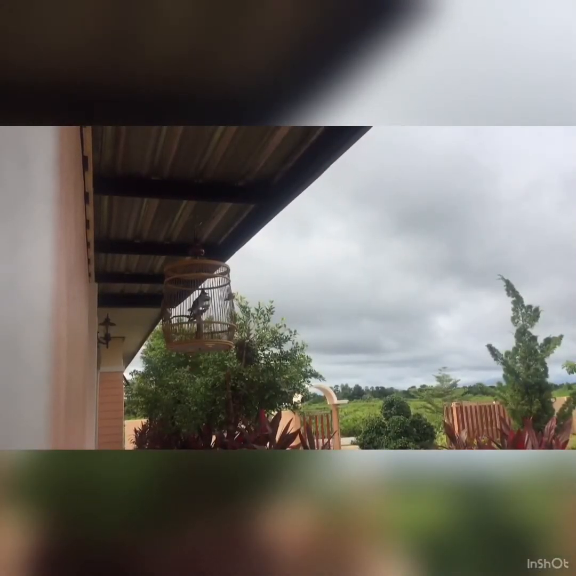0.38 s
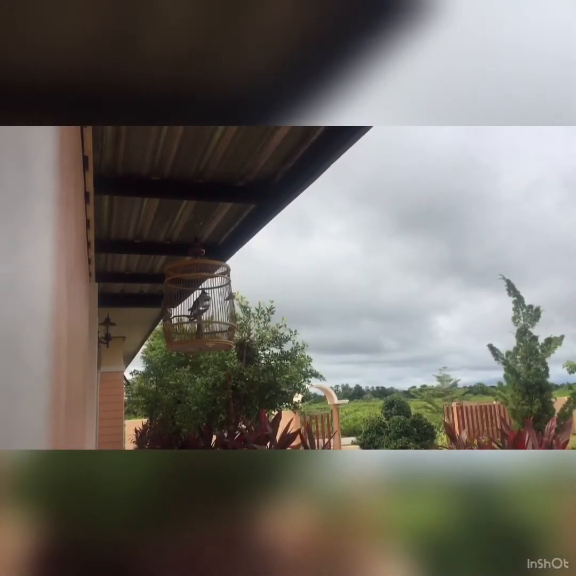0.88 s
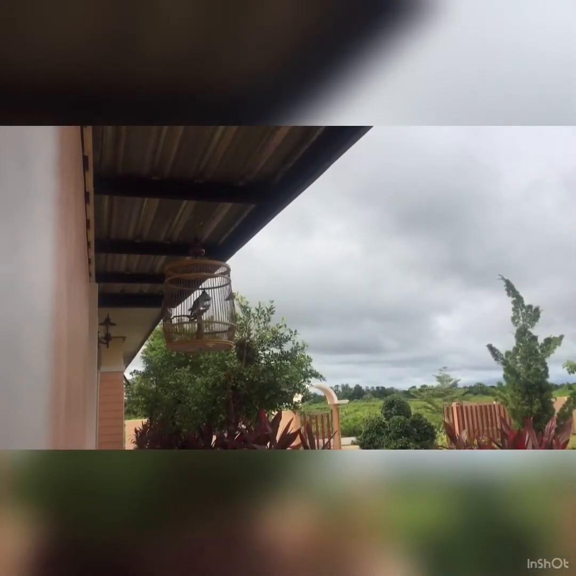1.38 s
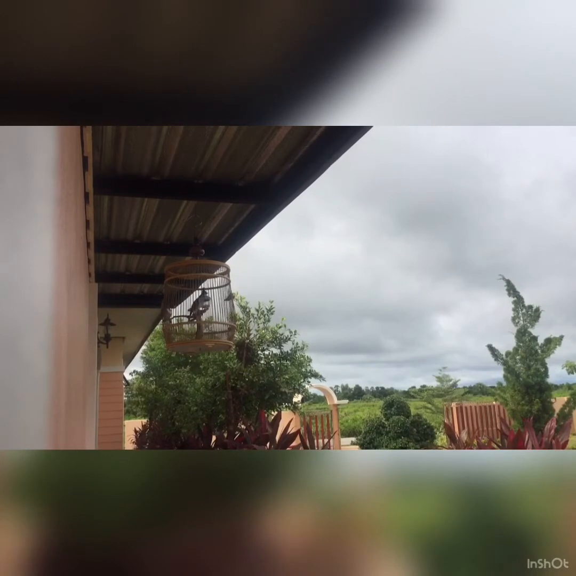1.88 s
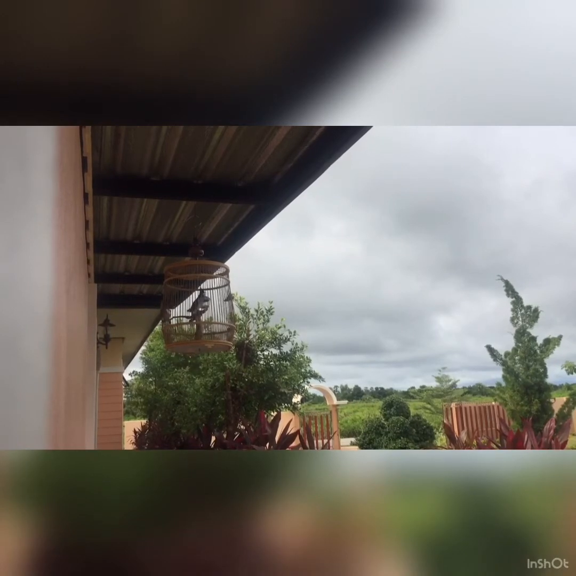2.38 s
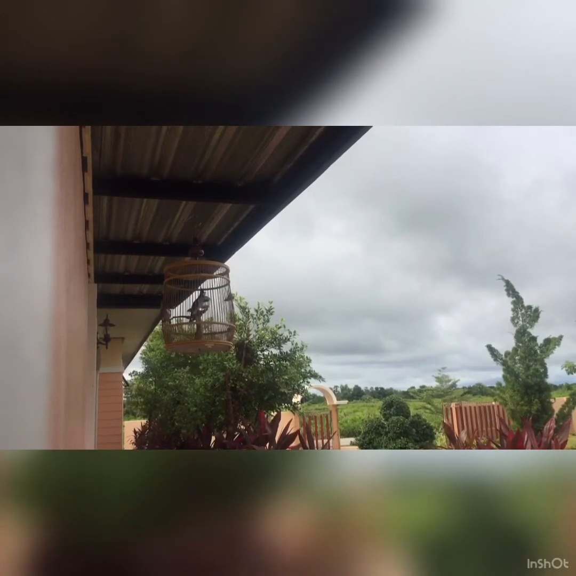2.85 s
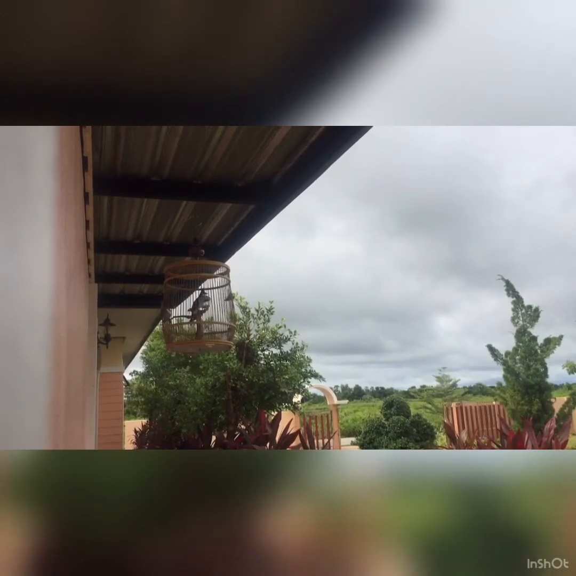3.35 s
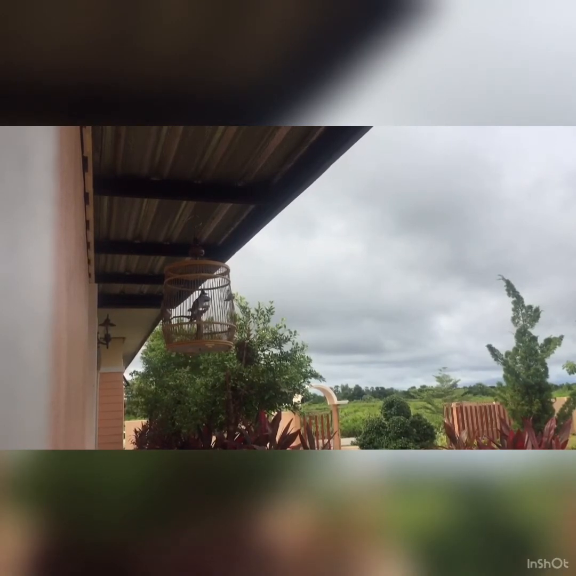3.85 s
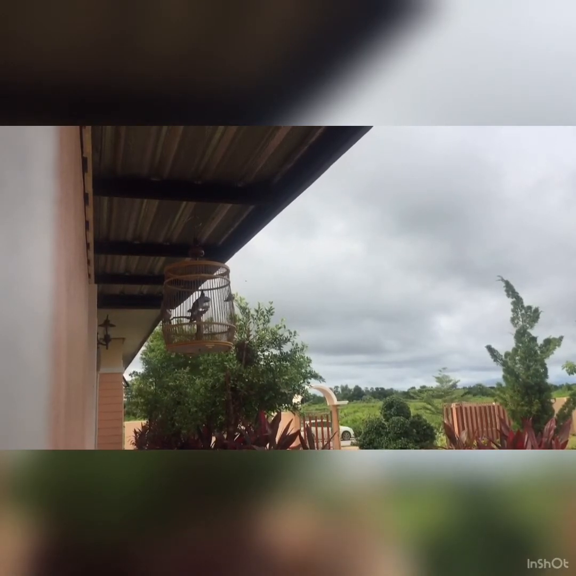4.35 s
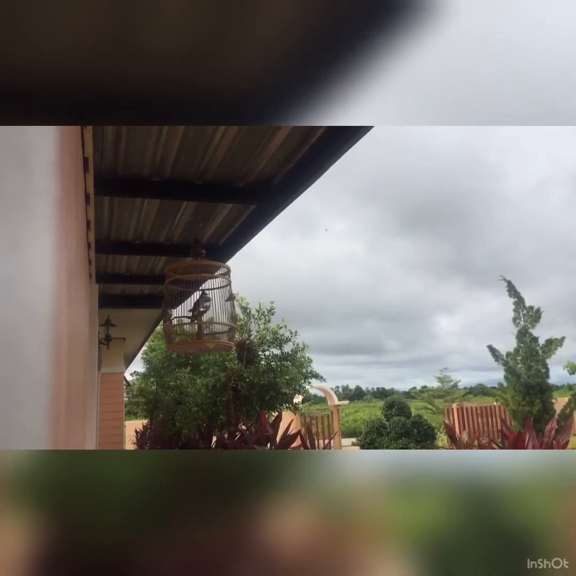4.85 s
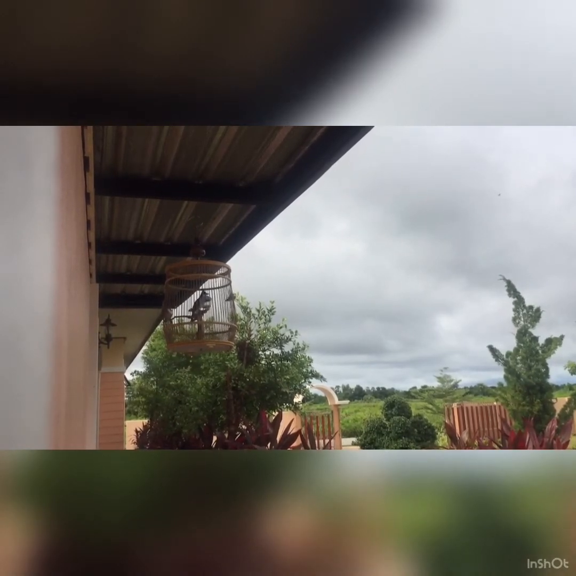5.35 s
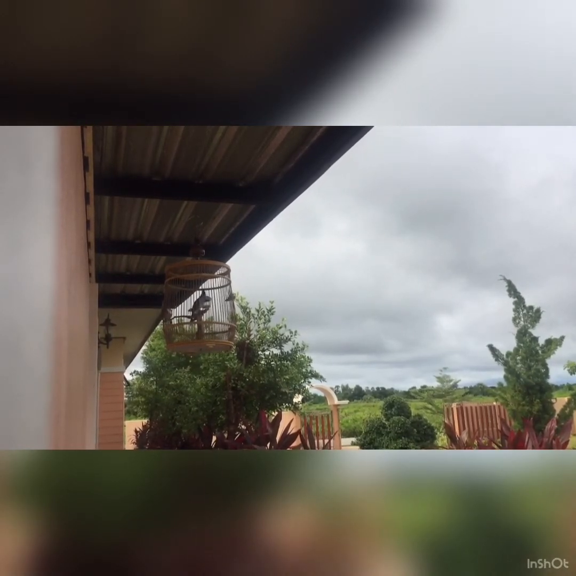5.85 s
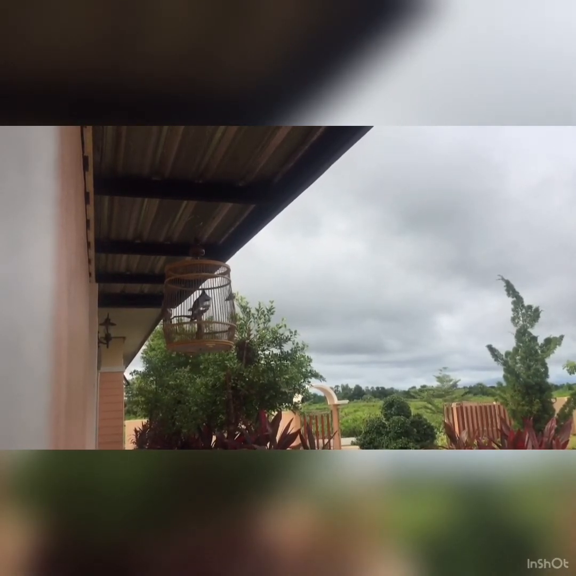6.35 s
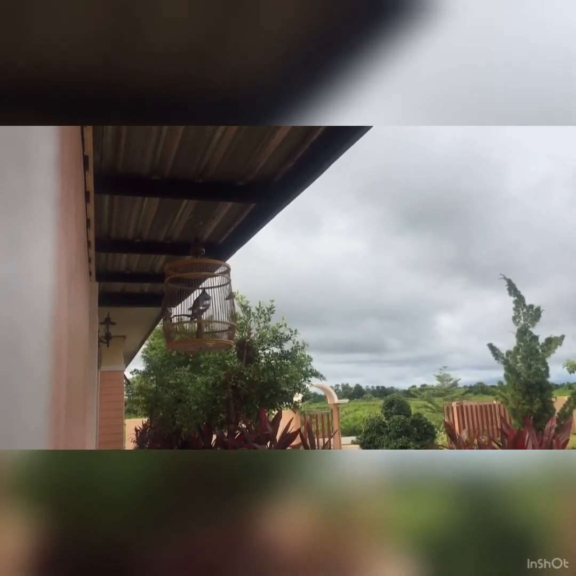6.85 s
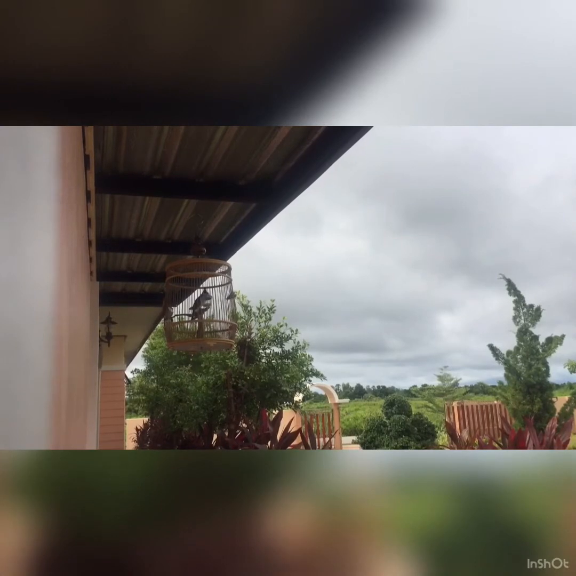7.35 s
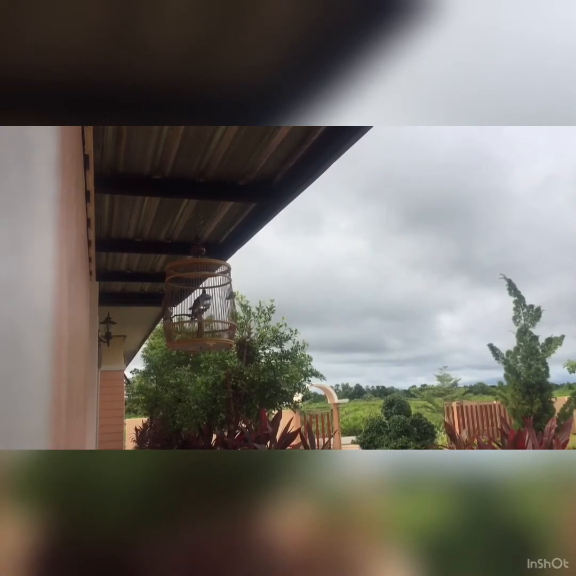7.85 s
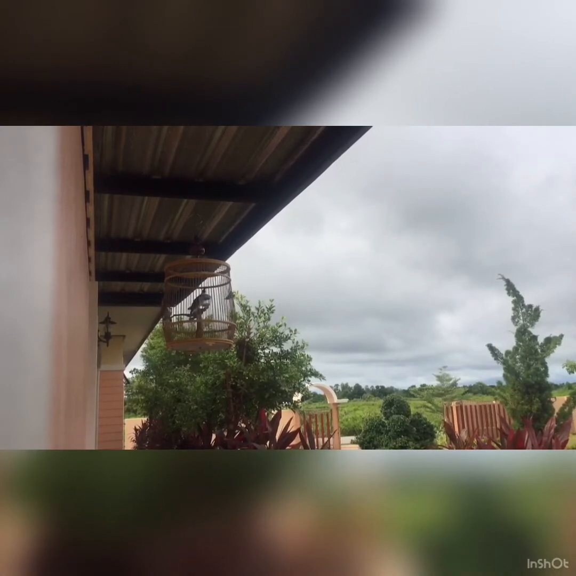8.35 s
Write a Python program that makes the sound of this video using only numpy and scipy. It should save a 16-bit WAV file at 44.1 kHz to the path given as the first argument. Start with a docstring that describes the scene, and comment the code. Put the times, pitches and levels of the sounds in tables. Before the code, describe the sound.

A small microphone under the eaves catches a quiet countryside: steady low hum, dull air and a faint insect whine, with a soft bright hiss fading at the start. A nearby songbird suddenly sings short, sharp, sliding whistles and a rattling roll, echoed by farther birds. A car's tyre roar rises quickly, passes and fades amid chirps. After a calm stretch, a short roll and two notes close it.

```python
"""A low engine hum, distant traffic and an insect's high buzz last all through; a bright hiss fades at first.
Near 2 s a caged songbird under the eaves of a country house sings whistled notes and a roll; others answer.
A car swells past beyond the garden near 5 s: shaped noise for its tyres, a wavering drone for its engine.
A neighbouring bird sings around it, and at the end, after a faint far call, sings a roll and two notes.
Birds are gliding near-sines with overtones and hiss, set among echoes; the insect is clicks that ring."""
import sys
import numpy as np
from scipy import signal
from scipy.fft import rfft, irfft
from scipy.io import wavfile
from scipy.ndimage import uniform_filter1d

SR = 44100
rng = np.random.default_rng(int(sys.argv[2]) if len(sys.argv) > 2 else 0)


def store_pcm(level_fs):
    """Save levels as 16-bit WAV."""
    pcm = np.round(np.clip(level_fs, -1, 1) * 32767).astype(np.int16)
    wavfile.write(sys.argv[1], SR, np.atleast_2d(pcm).T)


def nominal_scale(level):
    """Amplitude ratio for a level in decibels (scalar or array-like)."""
    x = np.asarray(level, float) / 20
    return 10 ** x


N = 384552  # samples

# colour of the steady background: [f/Hz, relative level/dB per Hz]
BACKGROUND_COLOUR = [(32, -42.5), (50, 11), (110, -3.5), (170, -9.5), (270, -12.5), (450, -22.5),
                     (700, -28.5), (1000, -18.5), (1500, -20), (2500, -34.5), (4200, -44.5), (6500, -46.5),
                     (9000, -49), (13000, -52), (15800, -58)]
# the insect's wing resonances: [f/Hz, width of each filter pass/Hz, gain/dB]
WINGS = [(11375, 420, -1), (11924, 400, -0.5)]
# the slow engine's hum: [multiple of its base pitch, rms level before swell and waver/dB]
HUM_ORDERS = [(2, -57.5), (3, -58.5), (4, -58), (5, -56), (6, -50.5), (7, -58), (8, -61.5), (9, -61.5),
              (10, -65), (11, -61.5)]
# how the whole hum rises and falls: [t/s, gain/dB]
HUM_SWELL = [(0, 1), (.7, 1), (1.4, -3), (3.5, -0.5), (6.5, -3), (8.7, -7)]
# the car engine's lowest tone: [t/s, f/Hz, rms level before the order gains/dB]
CAR_ENGINE = [(3.9, 55.5, -54), (4.5, 55, -48), (5.2, 54.6, -48), (6.5, 54.5, -46.5), (7.2, 54.3, -54.5),
              (8.72, 54, -60.5)]
# the car engine's orders: [multiple of the lowest tone, gain/dB, for upper ones when the car is nearest]
CAR_ENGINE_ORDERS = [(1, -1.5), (2, 1), (3, -3), (4, -8)]
# the passing car; its first rows also carry a separate bright hiss that fades within about a second:
# [t/s, level set on the roar's 600-1400 Hz part/dB, treble tilt/dB per octave]
ROAR_AND_HISS = [(0, -60, 5.5), (1.07, -52, 1.5), (2.2, -52.5, 0), (2.89, -50.5, 0), (3.74, -42, 1),
                 (4.03, -38, .5), (4.32, -38.5, -2), (4.55, -34, -3), (4.63, -32.5, -1), (4.71, -31, -2.5),
                 (4.8, -31, .3), (4.98, -34.5, -.5), (5.12, -39.5, -2.5), (5.66, -43, -.8), (6.3, -50, 1),
                 (6.6, -55, 1.5), (7.99, -66, -4), (8.72, -57.5, -6.5)]
# colour of the tyre roar: [f/Hz, relative level/dB per Hz]
TYRE_COLOUR = [(32, -40), (48, -3.5), (210, -3.5), (375, -12), (480, -17), (740, -4), (1000, 0),
               (1500, -8.5), (2320, -14.5), (4200, -28), (6500, -36.5), (10000, -50.5), (15000, -61.5)]
# single echoes off walls and ground: [delay t/s, level/dB]
ECHOES = [(.0035, -12.5), (.0072, -13.5), (.013, -17), (.019, -11), (.037, -16.5), (.088, -28), (.165, -23)]
# overtones of a bird's voice before the beak's colour: [multiple of the note, gain/dB]
OVERTONES = [(2, -1.5), (3, 2), (4, -7.5), (5, -11.5), (6, 0.5)]
# the beak's colour on overtones and rasp: [f/Hz, gain/dB]
BEAK = [(3200, -40), (4200, -29), (5500, -34.5), (7200, -50.5), (10000, -35.5), (12500, -39), (15500, -53)]
# Notes of the three voices: [start t/s, length/s, rms level of the sine before its fades/dB,
# start f/Hz, end f/Hz]; the far birds are heard mostly by their echoes.
FAR_NOTES = [ (.775, .02, -65.5, 4450, 4380), (2.414, .03, -41.5, 1850, 1860),
             (2.493, .055, -42.5, 3560, 3520), (2.762, .015, -36, 2940, 4000),
             (2.776, .032, -37, 3970, 2720), (2.800, .098, -48.5, 3930, 3330),
             (2.805, .06, -36, 2480, 2800), (2.862, .03, -33, 2800, 2860), (2.895, .047, -34.5, 2450, 2560),
             (2.965, .046, -42.5, 1980, 2500), (3.070, .023, -33.5, 3500, 3280),
             (3.092, .032, -36, 3460, 3430), (3.180, .043, -45.5, 1880, 2450),
             (3.218, .019, -33.5, 2940, 2860), (3.300, .03, -42, 3040, 3230),
             (8.008, .046, -56.5, 2900, 1980)]
NEIGHBOUR_NOTES = [ (3.335, .05, -42, 2430, 2370), (3.372, .022, -44, 1460, 1800),
                   (3.394, .04, -40, 1820, 1830), (3.912, .03, -39.5, 2830, 2920),
                   (4.002, .07, -38.5, 2400, 2300), (4.125, .06, -41.5, 1750, 2400),
                   (4.184, .019, -25.5, 2950, 3220), (4.205, .045, -30, 2850, 2850),
                   (5.178, .014, -29, 2250, 2570), (5.194, .012, -35, 2600, 2650),
                   (5.204, .022, -27.5, 3020, 3050), (5.228, .034, -31, 3050, 2350),
                   (5.264, .05, -43, 2200, 2260), (8.667, .018, -28, 2880, 2930),
                   (8.690, .034, -35, 2620, 2460)]
NEAR_NOTES = [ (1.778, .0074, -27.5, 2990, 2900), (1.782, .0225, -21.5, 2380, 2170),
              (1.805, .0163, -24, 1680, 1900), (1.824, .022, -18, 1990, 1950),
              (2.369, .026, -18, 2510, 2570), (2.390, .008, -25, 2400, 2230),
              (2.402, .009, -17.5, 2740, 2230), (2.416, .023, -26, 2400, 2400),
              (2.446, .0045, -18, 3150, 2810), (2.459, .0032, -21.5, 3350, 2600),
              (2.465, .014, -15, 3200, 3270), (2.479, .014, -14, 3250, 3250),
              (2.564, .043, -22, 2050, 1930), (2.606, .013, -18.5, 2230, 2500),
              (2.619, .0103, -21.5, 2720, 2780), (2.628, .011, -12.5, 2790, 2600),
              (2.643, .0052, -20.5, 2770, 2770), (2.651, .0236, -19.5, 2150, 1780)]


def evened(x):
    """Scales a signal to rms 1."""
    return x / np.sqrt(np.mean(x ** 2) + 1e-20)


def read(points, hz):
    """Reads a spectrum along a log-frequency axis, as pitch is heard."""
    f, value = np.transpose(points)
    return np.interp(np.log(hz + 1), np.log(f + 1), value)


def add(mix, start_s, sound):
    """Adds a sound into the mix at its start time."""
    part = mix[round(start_s * SR):][:len(sound)]
    part += sound[:len(part)]


def drift(t, top_hz, count=1):
    """Slow random wander made of 24 sines per row, each row at rms 1."""
    f = np.geomspace(top_hz / 30, top_hz, num=24)[:, None]
    rows = []
    for turns in rng.random((count, 24)):
        waves = np.sin(2 * np.pi * (f * t + turns[:, None])) / np.sqrt(f)
        rows.append(evened(waves.sum(0)))
    return np.array(rows)


def resonate(x, hz, width_hz):
    """Rings like a springy object, using a two-pole filter."""
    return signal.lfilter(*signal.iirpeak(hz, hz / width_hz, SR), x)


def noise(shape_db, patchy_db):
    """Random short-time spectra under a level field shape_db(hz, t), with drifting patches."""
    frames = N // 256 + 5
    hz = np.fft.rfftfreq(1024, 1 / SR)[:, None]
    t = np.arange(frames) * 256 / SR
    real, imaginary, patches = rng.standard_normal((frames, 513, 3)).T
    patches = uniform_filter1d(patches, size=10, axis=0)
    patches = evened(uniform_filter1d(patches, size=14, axis=1))
    spectra = (real + 1j * imaginary) * nominal_scale(shape_db(hz, t) + patchy_db * patches)
    return signal.istft(spectra, nperseg=1024, noverlap=768)[1][:N]


def background():
    """Distant traffic and outdoor air: steady coloured noise with slight patches."""
    colour = lambda hz, t: read(BACKGROUND_COLOUR, hz) + 0 * t
    return nominal_scale(-48) * evened(noise(colour, patchy_db=1.5))


def insect():
    """A file of three teeth a stroke, each a noisy click into the wing resonances."""
    strokes_per_s = 132.7
    tooth_db = np.array([1.5, -3, -2.5])
    t = np.arange(N) / SR
    teeth = 3 * strokes_per_s * t
    puffs = nominal_scale(tooth_db)[teeth.astype(int) % 3] * np.exp(-(teeth % 1) / .3)
    buzz = np.zeros(N)
    for hz, width_hz, db in WINGS:
        clicks = puffs * rng.standard_normal(N)
        once = resonate(clicks, hz, width_hz)
        buzz += nominal_scale(db) * resonate(once, hz, width_hz)
    wander = np.interp(t, t[::256], drift(t[::256], top_hz=12.)[0])
    return nominal_scale(-73.5 + 1.2 * wander) * evened(buzz)


def engine_hum():
    """Orders of a slow engine: multiples of one low pitch, wavering in pitch and level."""
    base_hz = 23.93
    t, slow_t = np.arange(N) / SR, np.arange(N // 64 + 1) * 64 / SR
    *level_wander, pitch_wander = drift(slow_t, top_hz=5., count=len(HUM_ORDERS) + 1)
    hz = base_hz * (1 + .004 * np.interp(t, slow_t, pitch_wander))
    phase = 2 * np.pi * np.cumsum(hz) / SR
    hum = np.zeros(N)
    for (k, db), wander in zip(HUM_ORDERS, level_wander):
        level = nominal_scale(db + 1.91 * np.interp(t, slow_t, wander))
        hum += level * np.sin(k * phase + k * k)
    return np.sqrt(2) * hum * nominal_scale(np.interp(t, *np.transpose(HUM_SWELL)))


def car_engine():
    """The car's engine drone: a wavering low tone with upper orders that carry only nearby."""
    t, slow_t = np.arange(N) / SR, np.arange(N // 64 + 1) * 64 / SR
    s, hz, db = np.transpose(CAR_ENGINE)
    wander = np.interp(t, slow_t, drift(slow_t, top_hz=5.)[0])
    phase = 2 * np.pi * np.cumsum(np.interp(t, s, hz) * (1 + .01 * wander)) / SR
    near = np.exp(-((t - 4.9) / 0.8) ** 2)
    drone = np.zeros(N)
    for k, gain_db in CAR_ENGINE_ORDERS:
        carry = near if k > 1 else 1
        drone += nominal_scale(gain_db) * np.sin(k * phase) * carry
    return np.sqrt(2) * drone * nominal_scale(np.interp(t, s, db, left=-90))


def roar_and_hiss():
    """An early bright hiss, then tyre roar and rumble, whose colour Doppler lowers as the car goes by."""
    nearest_s, passing_s, speed_m_per_s = 4.75, .4, 15.
    rumble_db, rumble_wander_db = 1.5, 2.5
    s, roar_db, tilt_db = np.transpose(ROAR_AND_HISS)

    def colour(hz, t):
        from_nearest = t - nearest_s
        approach = from_nearest / np.hypot(from_nearest, passing_s)
        stretch = 1 + speed_m_per_s / 343 * approach  # 343 m/s is the speed of sound
        rumble_share = np.clip(np.log2(500 / (hz + 1)), 0, 1)
        octaves_up = np.maximum(np.log2((hz + 1) / 1300), 0)
        rumble = rumble_share * (rumble_db + rumble_wander_db * drift(t, top_hz=3.))
        return read(TYRE_COLOUR, hz * stretch) + octaves_up * np.interp(t, s, tilt_db) + rumble

    roar = noise(colour, patchy_db=1.89)
    middle_band = signal.butter(3, [600, 1400], "band", fs=SR, output="sos")
    middle = signal.sosfilt(middle_band, roar)
    return roar / middle.std() * nominal_scale(np.interp(np.arange(N) / SR, s, roar_db))


def space(x, eaves_db, eaves_t60, yard_db, smeared):
    """Direct sound, single echoes, a short tail from the eaves and a long dull one from the yard.

    t60 is the time/s to fall 60 dB; smeared is the share (0-1) of the tails' input stirred by leaves."""
    t, close = np.arange(SR) / SR, np.zeros(SR)
    close[0] = 1
    for delay, db in ECHOES:
        close[round(delay * SR)] = nominal_scale(db)
    # two sets of sparse random clicks, one click in every 20 samples
    slots = np.arange(200, SR - 20, 20)
    at = slots + rng.integers(0, 20, (2, len(slots)))
    taps = np.zeros((2, SR))
    np.put_along_axis(taps, at, rng.choice([-1., 1.], at.shape), 1)
    eaves = taps[0] * nominal_scale(-60 * t / eaves_t60)
    eaves = nominal_scale(eaves_db) * eaves / np.linalg.norm(eaves)
    build_up = np.minimum(t / 0.1075, 1) ** 2  # the yard's far surfaces answer late
    yard = taps[1] * nominal_scale(-60 * t / 0.8) * build_up
    yard = nominal_scale(yard_db) * yard / np.linalg.norm(yard)  # level before the dulling
    yard = signal.lfilter(*signal.butter(1, 6000., fs=SR), yard)
    # stirring foliage smears the steady tones in the tails
    leaves = signal.butter(3, 170, fs=SR, output="sos")
    flutter = evened(signal.sosfilt(leaves, rng.standard_normal(N)))
    scattered = x * (np.sqrt(1 - smeared) + np.sqrt(smeared) * flutter)
    return (signal.fftconvolve(x, close) + signal.fftconvolve(scattered, yard + eaves))[:N]


def whistle(hz, envelope, db, fuzz_db, loss_db, harsh_db=0):
    """A near sine of rms level db before its envelope; overtones and rasp grow with effort.

    fuzz_db sets the blur against the note; loss_db is the treble slope per octave above 4 kHz."""
    rasp_db = -2.5  # hiss against the overtones, before harshness
    effort = 0.72  # extra treble dB per dB of the note above -16
    phase = 2 * np.pi * np.cumsum(hz) / SR
    *slow, hiss = rng.standard_normal((3, len(hz)))
    a, b = evened(signal.oaconvolve(slow, np.hanning(130)[None], "same"))
    note = np.sin(phase) + nominal_scale(fuzz_db) * (a * np.sin(phase) + b * np.cos(phase))
    overtones = sum(nominal_scale(d) * np.sin(k * (phase + .22 * b)) for k, d in OVERTONES)
    f = np.fft.rfftfreq(len(hz), 1 / SR)
    colour_db = read(BEAK, f) + loss_db * np.maximum(np.log2((f + 1) / 4000), 0)
    voice = envelope * (overtones + nominal_scale(rasp_db + harsh_db) * hiss)
    treble = irfft(rfft(voice) * nominal_scale(colour_db), len(hz))
    treble_gain = nominal_scale(harsh_db / 2 + effort * (db + 16))
    return np.sqrt(2) * nominal_scale(db) * (envelope * note + treble_gain * treble)


def song(notes, edge_s, fuzz_db, loss_db):
    """Each note glides from its start to its end pitch over a slight arch, with soft edges."""
    out = np.zeros(N)
    for s, length, db, start_hz, end_hz in notes:
        u = np.linspace(0, 1, round(length * SR))
        pitch = start_hz + (end_hz - start_hz) * u + 50 * np.sin(np.pi * u)  # 50 Hz arch
        edge = np.clip(np.minimum(u, 1 - u) * length / edge_s, 0, 1)
        envelope = np.sin(np.pi / 2 * edge) ** 2
        add(out, s, whistle(pitch, envelope, db, fuzz_db, loss_db))
    return out


def roll(start_s, flicks, per_s, top_db, first_hz, last_hz, fuzz_db, loss_db):
    """Short downward flicks of the voice that swell, then ease, and grow harsher as they climb."""
    flick_s, fall_hz = .008, 1050
    out, u = np.zeros(N), np.linspace(-.5, .5, round(flick_s * SR))
    for k, along in enumerate(np.linspace(0, 1, flicks)):
        hz = first_hz + (last_hz - first_hz) * along + 110 * np.sin(np.pi * along)
        db = top_db - 13 * (along - .7) ** 2  # strongest 0.7 of the way along
        harsh_db = -3 + 14 * along
        envelope = np.cos(np.pi * u) ** 2
        flick = whistle(hz - fall_hz * u, envelope, db, fuzz_db, loss_db, harsh_db)
        # the division makes db the sine's peak level
        add(out, start_s + k / per_s - flick_s / 2, flick / np.sqrt(2))
    return out


def far_birds():
    """Fuzzy notes with little treble, heard mostly by their echoes."""
    voice = song(FAR_NOTES, edge_s=.007, fuzz_db=-7, loss_db=-16)
    return space(voice, eaves_db=-0.5, eaves_t60=0.417, yard_db=-5, smeared=.6)


def neighbour_bird():
    """A half-hidden bird: softly edged notes and a short roll, with strong echoes."""
    tone = dict(fuzz_db=-14, loss_db=-1)
    voice = song(NEIGHBOUR_NOTES, edge_s=0.0045, **tone)
    voice += roll(8.639, flicks=4, per_s=140., top_db=-28, first_hz=2280, last_hz=2680, **tone)
    return space(voice, eaves_db=-6, eaves_t60=0.55, yard_db=-16, smeared=.15)


def near_bird():
    """The caged bird: crisp whistled notes and a rising roll, with weaker echoes."""
    tone = dict(fuzz_db=-18, loss_db=-0.78)
    voice = song(NEAR_NOTES, edge_s=0.0021, **tone)
    voice += roll(2.138, flicks=7, per_s=72.8, top_db=-12, first_hz=2260, last_hz=3250, **tone)
    return space(voice, eaves_db=-11, eaves_t60=0.27, yard_db=-21.5, smeared=.65)


def scene():
    """Birds in their space over the car, the early hiss and the steady layers."""
    steady = background() + insect() + engine_hum()
    passing = car_engine() + roar_and_hiss()
    birds = far_birds() + neighbour_bird() + near_bird()
    return (steady + passing + birds)[None]


def band_limit(x):
    """A steep low-pass at the top of the band."""
    return signal.sosfilt(signal.butter(12, 15720, fs=SR, output="sos"), x)


def record(dry):
    """A small microphone that drops the deepest bass, below about 43 Hz."""
    bass_cut = signal.butter(6, 43., "high", fs=SR, output="sos")
    mix = signal.sosfilt(bass_cut, dry)
    return band_limit(mix)


dry = scene()
out = record(dry)
store_pcm(out)
```